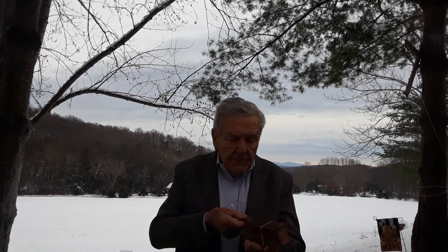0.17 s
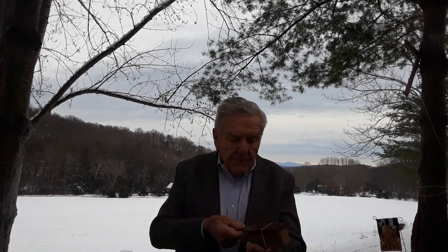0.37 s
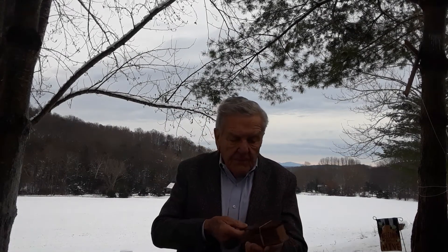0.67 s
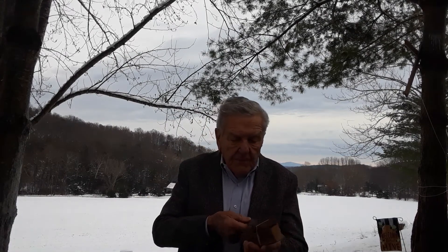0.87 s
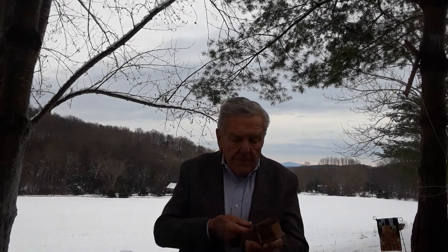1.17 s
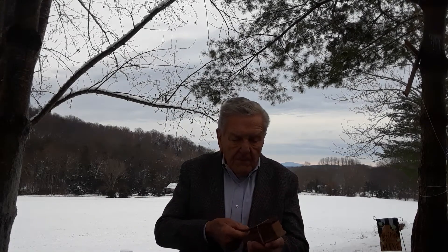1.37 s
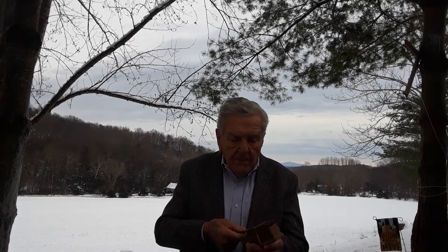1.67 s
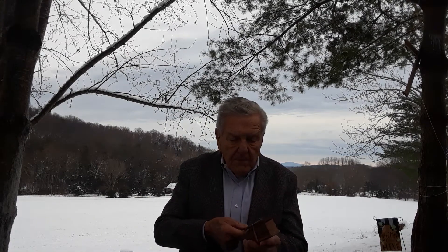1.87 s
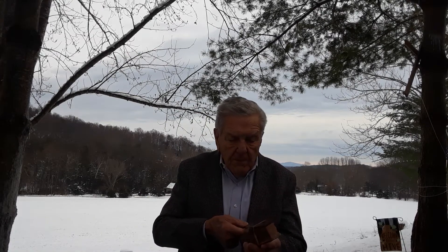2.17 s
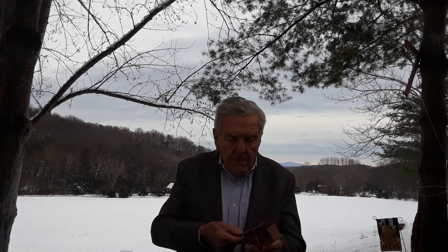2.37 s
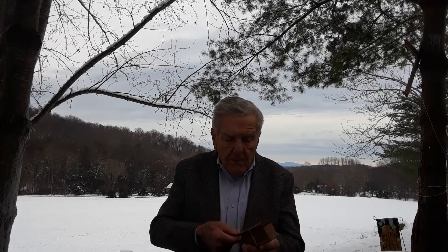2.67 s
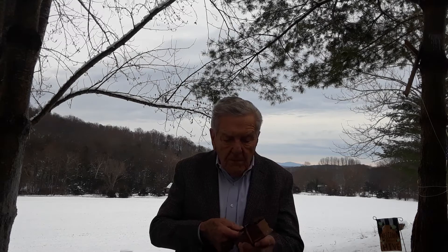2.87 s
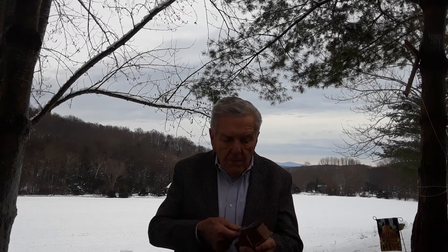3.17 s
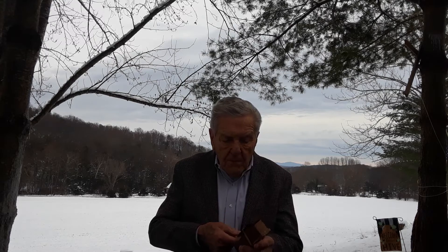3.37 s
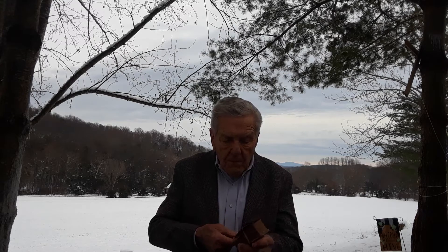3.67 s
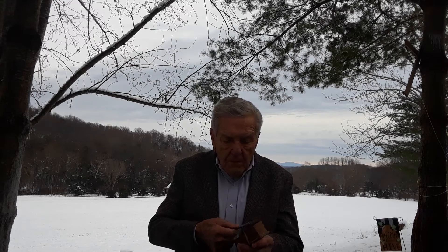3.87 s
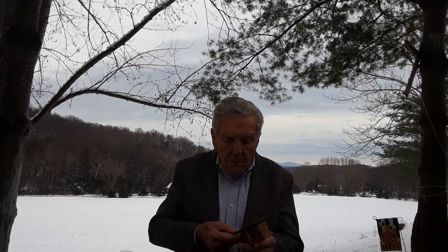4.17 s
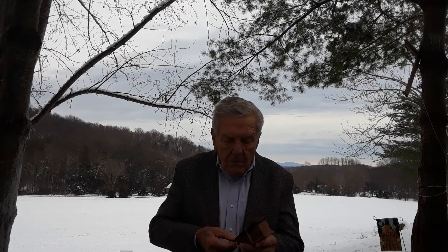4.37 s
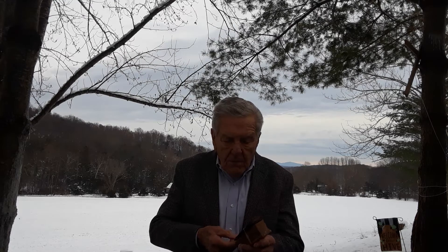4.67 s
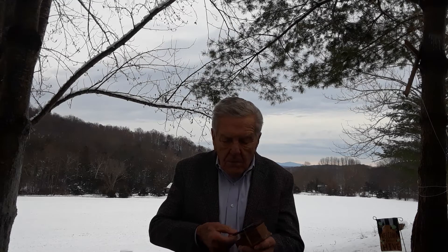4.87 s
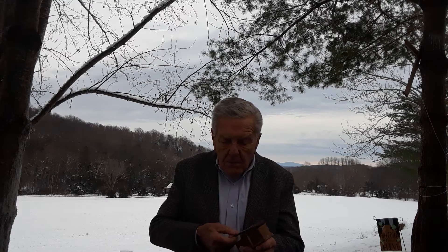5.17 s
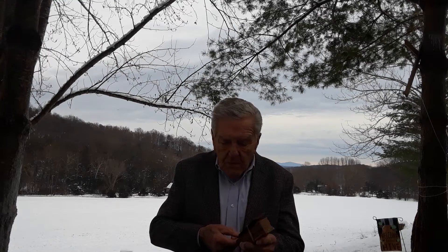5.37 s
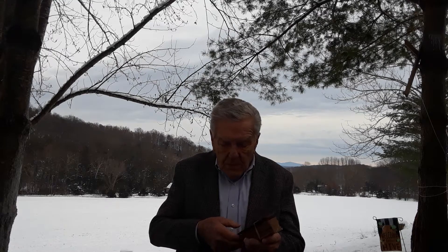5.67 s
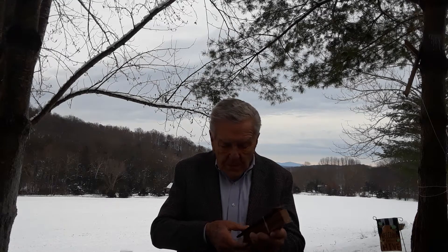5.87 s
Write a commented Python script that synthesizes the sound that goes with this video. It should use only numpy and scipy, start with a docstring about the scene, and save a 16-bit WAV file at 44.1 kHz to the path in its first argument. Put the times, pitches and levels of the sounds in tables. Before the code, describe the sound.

A hand-worked wooden box call, close and slightly right, in quiet outdoor air with a faint low hum. A weak raspy tail opens the clip, then light taps and tiny squeaks. Thin, hesitant yelps come at about 0.35, 0.7 and 1.35 seconds, with a scuff just before the last. The run strengthens at 1.65, 1.95, 2.3 and 2.6: sharp high squeals, mostly breaking downward into a lower scratchy rasp. From 2.7 to 3.6 there is a pause with dry rubs and barely audible lid squeaks. The second run yelps at 3.65, 4.0, 4.3, 4.65, 5.05 and 5.37, the 4.3 and 5.05 notes low and rough. Hollow wooden knocks cluster from 5.05 to 5.3. A short squeak at 5.64 and a soft knock at 5.7 finish it. Sleeves rustle lightly throughout; trees give short, diffuse echoes.

```python
"""Wooden box call in a wood

Two runs of yelps with a pause between: the lid sticks and slips on the rim in higher, mostly clearer notes
and lower raspy ones, which mostly follow them. Pitched partials, friction hiss and box modes make the tone.
The lid squeaks faintly on its way back; the box knocks, thuds and scuffs in the hand.
Sleeves rustle (filtered noise), trees echo (decaying scatter), a low hum lies under the still air."""
import sys
import numpy as np
from scipy import signal
from scipy.fft import rfft, irfft, next_fast_len
from scipy.io import wavfile

SR = 44100
rng = np.random.default_rng(int(sys.argv[2]) if len(sys.argv) > 2 else 0)


def wav_out(sig):
    """Save sig, one row per channel (or a flat mono array), as 16-bit PCM at SR to the path in sys.argv[1]."""
    wavfile.write(sys.argv[1], SR, np.round(np.clip(np.atleast_2d(sig).T, -1, 1) * 32767).astype(np.int16))


N = 264776
TIME = np.arange(N) / SR
CUTOFF_HZ = 16000

# wood knocking on wood: (time [s], strike level [dB], hollow thud over strike [dB])
KNOCK_STRIKES = [(0.142, -36.5, -3.5), (0.185, -39, 2.5), (0.295, -40.5, -5), (0.448, -36, 0.5),
                 (1.395, -34.5, -20.5), (2.5493, -48, -24), (5.0456, -17, 6), (5.061, -20.5, 8.5),
                 (5.093, -19, 5.5), (5.106, -20, -1), (5.1674, -14, 0), (5.170, -24.5, 16.5),
                 (5.176, -20.5, 1), (5.2845, -22.5, -7), (5.3024, -17.5, -6.5), (5.705, -30.5, -9)]


def from_db(db):
    """Decibels to gain."""
    return 10 ** (np.asarray(db) / 20)


def rms_one(x):
    """Scale to unit power."""
    return x / np.sqrt(np.mean(x ** 2) + 1e-20)


def gain_at(spectrum, hz):
    """Gain of a (Hz, dB) curve, interpolated on a log-frequency axis."""
    points_hz, db = np.transpose(spectrum)
    return from_db(np.interp(np.log(hz + 1e-9), np.log(points_hz), db))


def coloured(x, spectrum):
    """Filter a noise to a spectrum; overall rms 1."""
    size = x.shape[-1]
    gain = gain_at(spectrum, np.fft.rfftfreq(size, 1 / SR))
    return rms_one(irfft(rfft(x) * gain, size))


def flutter(rate_hz):
    """Random motion up to about the given rate; spread 1."""
    size = next_fast_len(N, real=True)
    hz = np.fft.rfftfreq(size, 1 / SR)
    noise = rfft(rng.standard_normal(size))
    return rms_one(irfft(noise / (1 + (hz / rate_hz) ** 2), size)[:N])


def resonance(x, hz, width_hz):
    """One damped mode with gain 1 at its top."""
    r = np.exp(-np.pi * width_hz / SR)
    b = np.array([1, 0, -1]) * (1 - r * r) / 2
    a = [1, -2 * r * np.cos(2 * np.pi * hz / SR), r * r]
    return signal.lfilter(b, a, x + 1e-18)


def placed(x):
    """Off to the right: over most of the band that side is earlier and louder."""
    # (frequency [Hz], phase by which left leads right [rad])
    phase_lead = [(100, 0), (1000, 1.02), (1400, -0.58), (2000, -0.5), (3300, -1.15), (5000, -1.75),
                  (8300, -2.0), (12000, -2), (16000, -1.5)]
    # (frequency [Hz], left over right [dB])
    balance = [(100, 2.5), (700, -0.5), (1300, -2), (2400, -3.5), (4400, -2.5), (8000, -5), (16000, 4)]
    hz = np.fft.rfftfreq(N, 1 / SR)
    points_hz, radians = np.transpose(phase_lead)
    lead = np.interp(hz, [0, *points_hz], [0, *np.unwrap(radians)])
    # each side takes half of the difference
    half = np.sqrt(gain_at(balance, hz)) * np.exp(.5j * lead)
    return irfft(rfft(x) * np.array([half, 1 / half]), N)


def still_air(level_db=-58.5, apart_db=3.0):
    """Coloured noise, partly common to both sides and partly separate."""
    # (frequency [Hz], relative density [dB per Hz])
    air_colour = [(53, -31.5), (90, -3.5), (210, -12.5), (737, -2.5), (915, -5.5), (1380, -4.5),
                  (3360, -28), (5070, -30.5), (7660, -31), (9720, -45), (15000, -27), (16000, -44.5)]
    common = rng.standard_normal(N)
    apart = from_db(apart_db) * rng.standard_normal((2, N))
    return from_db(level_db) * coloured(common + apart, air_colour)


def hum(hum_hz=65.5, level_db=-68, waver=.13):
    """A low sine whose strength and phase waver."""
    phase = 2 * np.pi * hum_hz * TIME
    in_phase = np.sin(phase) * (1 + waver * flutter(rate_hz=9))
    quadrature = waver * flutter(rate_hz=6.4) * np.cos(phase)
    return from_db(level_db) * np.sqrt(2) * (in_phase + quadrature)


def rustle(raise_db=5.0, folds_db=3.5):
    """Sleeves and hands rustle as the arm moves: coloured noise broken up by folds of cloth."""
    # (time [s], level before raise_db [dB])
    cloth_level = [(0.0, -65.5), (0.53, -70), (0.95, -67.5), (1.08, -63.5), (1.3, -73.5), (1.52, -64.5),
                   (1.75, -66.5), (2.22, -62), (2.39, -67), (2.71, -77), (2.94, -71), (3.68, -75),
                   (3.81, -77.5), (4.24, -62.5), (4.43, -69.5), (5.52, -69.5), (5.73, -75), (6.0, -77)]
    # (frequency [Hz], relative density [dB per Hz])
    cloth_colour = [(1000, 0), (3000, 5.5), (4200, -3), (5500, -4), (8000, 1.5), (9700, -9), (12000, -5.5),
                    (15500, -1)]
    folds = rms_one(from_db(folds_db * flutter(rate_hz=60)))
    noise = placed(rng.standard_normal(N)) + 1.2 * rng.standard_normal((2, N))
    level_db = np.interp(TIME, *np.transpose(cloth_level)) + raise_db
    return from_db(level_db) * coloured(noise, cloth_colour) * folds


def background():
    """Sum of the steady layers: still air, hum and rustling cloth."""
    return still_air() + hum() + rustle()


def echoes(x, level_db, t60_s, delay_s):
    """Scattered returns from trunks and branches: decaying noise, different at each ear."""
    # (frequency [Hz], relative response [dB])
    wood_colour = [(150, -15), (500, 8.5), (1300, -4), (2300, 2), (5000, -3.5), (9000, -3.5), (16000, 1.5)]
    t = TIME[:SR]
    decay = from_db(-60 * t / t60_s)
    onset = np.clip(t / delay_s - 1, 0, 1)
    scatter = coloured(rng.standard_normal((2, SR)), wood_colour) * decay * onset
    scatter /= np.sqrt(np.sum(scatter ** 2, axis=1, keepdims=True))
    return from_db(level_db) * signal.fftconvolve(x[None], scatter, axes=1)[:, :N]


def bumps():
    """Soft swells of band-limited noise as hand and sleeve shift."""
    # (time [s], level [dB], length [s], centre [Hz])
    swells = [(0.93, -64, 0.21, 2690), (0.978, -70, 0.15, 4900), (1.3, -60, 0.23, 460),
              (1.381, -60, 0.064, 182), (1.988, -60, 0.17, 385), (2.0, -58, 0.098, 14160),
              (2.098, -63, 0.14, 171.6), (3.98, -61, 0.039, 111.7), (4.872, -55.5, 0.071, 125)]
    out = np.zeros(N)
    for s, db, length_s, hz in swells:
        swell = np.sin(np.pi * np.clip((TIME - s) / length_s, 0, 1))
        noise = resonance(resonance(rng.standard_normal(N), hz, hz / 2), hz, hz)
        out += from_db(db) * swell * rms_one(noise)
    return out


def thuds(thud_db=25.0, low_db=17.5):
    """The hollow of the box answers the knocks: impulses into broad low modes."""
    taps = np.zeros(N)
    for s, db, hollow_db in KNOCK_STRIKES:
        taps[round(s * SR)] = from_db(db + hollow_db)
    hollow = from_db(thud_db) * resonance(taps, hz=400.0, width_hz=410)
    hollow += from_db(low_db) * resonance(taps, hz=196, width_hz=88)
    return resonance(hollow, hz=374, width_hz=480)


def box(x, damping=1):
    """All modes of the box in parallel; damping widens them."""
    # (frequency [Hz], width at damping 1 [Hz], gain [dB])
    modes = [(1055, 41, -46), (1424, 17, 38), (1400, 67, 11), (1915, 59, 21.5), (1924, 52, 3),
             (2440, 130, 27.5), (2670, 140, -32.5), (3070, 120, -22.5), (3850, 97, -6.5),
             (3850, 220, -17.5), (4380, 310, -13.5), (5100, 560, 1), (6860, 630, -17.5), (8300, 400, -40)]
    return sum(from_db(db) * resonance(x, hz, width_hz * damping) for hz, width_hz, db in modes)


def knocks(ring_db=-10.0, tick_db=28.5, contact_hz=3500):
    """Each knock ticks and rings the hand-damped box; soft wood dulls the contact."""
    taps = np.zeros(N)
    for s, db, _ in KNOCK_STRIKES:
        taps[round(s * SR)] = from_db(db)
    taps = signal.sosfilt(signal.butter(1, contact_hz, fs=SR, output="sos"), taps)
    tick = resonance(resonance(taps, hz=1270, width_hz=690), hz=1290, width_hz=550)
    return from_db(ring_db) * box(taps, damping=1.3) + from_db(tick_db) * tick


def scuffs(grain_db=1.0):
    """Dry grainy rubs of lid and fingers: noise that starts at once and fades exponentially."""
    # (time [s], level [dB], fade time constant [s])
    rubs = [(0.133, -59, .005), (0.238, -42.5, 0.0021), (0.484, -50, 0.013), (0.848, -50.5, 0.02),
            (1.287, -29.5, 0.014), (1.396, -39.5, 0.0026), (1.442, -49, 0.031), (2.685, -37, 0.016),
            (2.783, -44.5, 0.03), (3.218, -58.5, 0.041), (3.392, -56, .013), (3.963, -45, 0.011),
            (4.157, -42.5, 0.0025), (4.223, -45, 0.019), (4.268, -40, 0.0059), (4.87, -40.5, 0.0054)]
    # (frequency [Hz], relative density [dB per Hz])
    rub_colour = [(150, -22.5), (600, -0.5), (1300, -2), (2500, 2), (4500, -4), (8000, -5.5), (10000, -16),
                  (15000, -8.5)]
    level = np.zeros(N)
    for s, db, fade_s in rubs:
        level += from_db(db) * (TIME >= s) * np.exp(-np.abs(TIME - s) / fade_s)
    grain = rng.standard_normal(N) * from_db(grain_db * flutter(rate_hz=650))
    return level * coloured(grain, rub_colour)


def wood_grain(x, t60_s, share):
    """The plank's many small, quickly dying resonances break gliding partials into blotches."""
    t = TIME[:SR // 20]
    ring = rng.standard_normal(len(t)) * from_db(-60 * t / t60_s)
    rung = signal.fftconvolve(x, ring / np.linalg.norm(ring))[:N]
    return np.sqrt(1 - share) * x + np.sqrt(share) * rung


def second_mode(pitch_hz, first, phase, level_db=-4.5, mode_hz=2275, pull=0.45, mixing=0.12, beat_db=-4.0):
    """On a rough high note a second mode of the wall sings along and mixes with the slip rate."""
    own_hz = mode_hz + pull * (pitch_hz - 1320) + 25 * flutter(rate_hz=220)
    own = 2 * np.pi * np.cumsum(own_hz) / SR
    high_share = np.interp(pitch_hz, [1150, 1280, 1450], [0.13, 0.8, 0.35])
    mixed = np.sin(own) * (1 + mixing * np.cos(phase))
    mixed += from_db(beat_db) * np.sin(2 * (own - phase))
    return from_db(level_db) * first * high_share * mixed


def partials(pitch_hz, phase, upper, rasp, brightening=0.6, chatter_db=5.0):
    """Third and higher harmonics: brighter when the lid bites harder, throbbing as it chatters."""
    # the box's radiation: (frequency [Hz], relative response [dB])
    radiation = [(2500, 4.5), (3150, 5.5), (3700, -0.5), (4400, -1.5), (5300, -1.5), (6500, -13.5),
                 (7300, -12), (8400, -11), (9400, -35.5), (11000, -27), (14500, -37.5), (16000, -45)]
    orders = np.arange(3, 17)[:, None]
    partial_hz = orders * pitch_hz
    bite_db = np.clip(20 * np.log10(upper + 1e-9) + 28, -20, 4)
    tilt = from_db(brightening * bite_db * np.log2(orders / 3))
    shape = gain_at(radiation, partial_hz) * (partial_hz < CUTOFF_HZ) * tilt
    shape = shape / np.sqrt(np.sum(shape ** 2, axis=0))
    wobbles = [flutter(rate_hz=220) for _ in range(5)]
    tone = np.zeros(N)
    for k, gain in zip(orders[:, 0], shape):
        # higher partials lose step with the slips sooner
        wobble = .5 * np.sqrt(k) * (rasp + .1) * wobbles[k % 5]
        tone += gain * np.sin(k * phase + k * k + wobble)
    return upper * tone * rms_one(from_db(chatter_db * flutter(rate_hz=46)))


def stick_slip(pitch_hz, first, octave, upper, rasp, jitter=0.016, shimmer=0.25, ring_db=-6.5, hiss_db=0.0):
    """The lid slips once a cycle; rasp unsettles the rate and the partials and shakes the box's modes."""
    # hiss of the rubbing wood: (frequency [Hz], relative density [dB per Hz])
    friction_colour = [(200, -57), (650, -31.5), (950, 11.5), (1900, 12.5), (3000, -8.5), (5000, -36),
                       (6500, -25), (8300, -8), (9500, -55.5), (14500, -37), (16500, -42.5)]
    slip_hz = pitch_hz * (1 + jitter * rasp * flutter(rate_hz=540))
    phase = 2 * np.pi * np.cumsum(slip_hz) / SR
    low = first * (1 + shimmer * rasp * flutter(rate_hz=120)) * np.sin(phase)
    octave_level = octave * (1 + 2 * shimmer * rasp * flutter(rate_hz=63))
    low += octave_level * np.sin(2 * phase + rasp * flutter(rate_hz=37))
    high = wood_grain(partials(pitch_hz, phase, upper, rasp), t60_s=.02, share=.38)
    tone = low + high + second_mode(pitch_hz, first * rasp, phase)
    # every slip drags a puff of friction noise with it
    puffs = 1 + 0.26 * np.cos(phase)
    force = rasp * np.sqrt(0.22 * first ** 2 + 0.25 * octave ** 2 + upper ** 2)
    grain = rng.standard_normal(N) * puffs
    ringing = box(grain * force) / np.std(box(grain))
    hiss_level = rasp * np.hypot(upper, 0.65 * force)
    hiss = hiss_level * coloured(rng.standard_normal(N) * puffs, friction_colour)
    return np.sqrt(2) * tone + from_db(ring_db) * ringing + from_db(hiss_db) * hiss


def squeaks(sag=0.24, octave_db=-19.5, upper_db=-15.0, bite=.45, rasp=0.94):
    """The returning lid catches for a few cycles, sagging in pitch; firmer catches carry more overtones."""
    # light touches of the lid: (time [s], mid pitch [Hz], peak level [dB], length [s])
    touches = [(.229, 1453, -46, 0.011), (.245, 1310, -43, 0.026), (.443, 1355, -51.5, 0.0054),
               (.604, 1386, -49.5, 0.0075), (.926, 1482, -45, 0.016), (1.219, 1442, -50, 0.0055),
               (1.423, 1314, -45.5, 0.0083), (1.537, 1393, -48, .009), (1.852, 1547, -45, 0.0059),
               (2.203, 1272, -42, 0.01), (2.55, 1499, -33.5, 0.014), (2.871, 1404, -50.5, 0.0087),
               (2.98, 1375, -52, 0.02), (3.129, 1428, -54, 0.017), (4.266, 1402, -36, .016),
               (4.504, 1350, -46.5, 0.015), (4.572, 1461, -43.5, .014), (4.59, 1434, -36, .008),
               (4.85, 1403, -48, .018), (5.002, 1404, -33.5, .014), (5.149, 1367, -43, .014),
               (5.637, 1456, -27.5, 0.012)]
    pitch_hz, level = np.full(N, float(touches[0][1])), np.zeros(N)
    for s, hz, db, length_s in touches:
        now = (TIME >= s) & (TIME < s + length_s)
        progress = (TIME[now] - s) / length_s
        pitch_hz[now] = hz * (1 + sag * (.5 - progress))
        level[now] = from_db(db) * np.sin(np.pi * progress ** 0.65)
    overtones = level * (level / level.max()) ** bite
    octave, upper = overtones * from_db(octave_db), overtones * from_db(upper_db)
    return stick_slip(pitch_hz, level, octave, upper, rasp, jitter=.07, shimmer=0.56, hiss_db=2.5)


def lid_ring(x, hz=1795, width_hz=13, level_db=-4.0):
    """A lightly damped mode of the lid sings on after a stroke."""
    return from_db(level_db) * resonance(x, hz, width_hz)


def note_span(s, length_s, attack_s, release_s, margin_s=.04):
    """A squeal grows and dies exponentially; gives its samples, age [s] and envelope."""
    now = (TIME >= s - margin_s) & (TIME < s + length_s + margin_s)
    age_s = TIME[now] - s
    attack = 1 / (1 + np.exp(-age_s / attack_s))
    contact = attack / (1 + np.exp((age_s - length_s) / release_s))
    return now, np.clip(age_s, 0, length_s), contact


def high_note(s, length_s, attack_s, hz, glide, db, octave_db, upper_db, rasp):
    """The lid grips: a higher note that sags, brightens as the lid presses harder, and dives at its end."""
    dive_hz, dive_s, bite_db_per_s = 69.5, 0.0036, 179.5
    now, age_s, contact = note_span(s, length_s, attack_s, release_s=0.0033)
    from_middle_s = age_s - length_s / 2
    dive = dive_hz * np.exp((age_s - length_s) / dive_s)
    pitch_hz = hz + glide * from_middle_s - dive
    bite_db = bite_db_per_s * from_middle_s
    return now, contact, (pitch_hz, db, octave_db + bite_db, upper_db + bite_db, rasp)


def low_note(s, length_s, attack_s, hz, glide, db, octave_db, upper_db, rasp):
    """A looser grip: a lower note whose pitch drops at its start in a burst of rasp, then glides and fades."""
    drop_hz, drop_s = 150, .0055   # start above the glide, settling time
    burst_rasp, burst_s = 0.3, .012
    fade_db_per_s, octave_fade_db_per_s = 40, 65.5
    now, age_s, contact = note_span(s, length_s, attack_s, release_s=.005)
    from_middle_s = age_s - length_s / 2
    pitch_hz = hz + glide * from_middle_s + drop_hz * np.exp(-age_s / drop_s)
    rough = rasp + burst_rasp * np.exp(-age_s / burst_s)
    first_db = db - fade_db_per_s * from_middle_s
    octave_db = octave_db - octave_fade_db_per_s * from_middle_s
    return now, contact, (pitch_hz, first_db, octave_db, upper_db, rough)


def sing(notes):
    """Join notes into one squeal; where two overlap, pitch and rasp slide from one to the other."""
    pitch_hz, first, octave, upper, rasp, weight = np.zeros((6, N))
    for now, contact, (hz, db, octave_db, upper_db, rough) in notes:
        first[now] += contact * from_db(db)
        octave[now] += contact * from_db(db + octave_db)
        upper[now] += contact * from_db(db + upper_db)
        pitch_hz[now] += contact * hz
        rasp[now] += contact * rough
        weight[now] += contact
    touching = weight > 0

    def joined(total):
        """Contact-weighted mean, bridged across the gaps."""
        return np.interp(TIME, TIME[touching], total[touching] / weight[touching])

    return stick_slip(joined(pitch_hz), first, octave, upper, np.clip(joined(rasp), 0, 1))


def yelps():
    """Full strokes of the lid; where a high and a low note meet, both sound together for a moment."""
    # higher, mostly clearer notes, usually at the start of a stroke: (time [s], length [s], attack [s],
    # mid pitch before dive [Hz], glide [Hz/s], fundamental level [dB], mid octave over fundamental [dB],
    # mid upper partials over fundamental [dB], rasp [0-1])
    higher_notes = [(0.366, 0.022, 0.0086, 1318, -500, -22, -18.5, -21, 0.37),
                    (0.706, 0.024, 0.0025, 1446, -2500, -22, -13.5, -20.5, 0.36),
                    (1.351, 0.023, 0.0055, 1478, -4500, -23.5, -12.5, -24, 0.36),
                    (1.636, 0.028, .0022, 1421, -3500, -16.5, -11, -17.5, 0.18),
                    (1.686, 0.020, 0.0032, 1434, -500, -26.5, -27, -26.5, .3),
                    (1.936, 0.019, 0.0047, 1335, -600, -10.5, -13.5, -18, 0.6),
                    (2.284, 0.025, 0.0034, 1319, -600, -16.5, -11.5, -14, 0.52),
                    (2.592, 0.029, 0.0033, 1330, -400, -20.5, -9.5, -13, 0.63),
                    (3.659, 0.016, 0.002, 1380, -2700, -16, -13, -12, 0.02),
                    (3.976, 0.015, 0.0013, 1347, -4200, -16.5, -19.5, -14, 0.36),
                    (4.651, 0.027, 0.0037, 1125, -400, -25.5, 7.5, 0.5, 0.18),
                    (5.366, 0.020, 0.0028, 1348, -500, -11, -17.5, -14.5, 0.71)]
    # lower raspy notes, mostly after a clear note, some before one or alone: (time [s], length [s],
    # attack [s], mid pitch before initial drop [Hz], glide [Hz/s], mid fundamental level [dB],
    # mid octave over db column [dB], upper partials over db column [dB], rasp before burst [0-1])
    lower_notes = [(-0.025, 0.075, 0.0026, 883, -1400, -42.5, 13, 5.5, 0.26),
                   (0.344, 0.044, 0.0033, 963.5, -1800, -41.5, 5, -13, 0.29),
                   (1.670, 0.014, 0.0021, 1203, -2500, -29, -4, -23, 0.5),
                   (1.964, 0.039, 0.00141, 900.7, -300, -31, 8.5, 5, 0.43),
                   (2.312, 0.033, 0.0023, 1005, -2500, -36.5, 13.5, 5, 0.88),
                   (2.623, 0.02, 0.0028, 969.7, 3506, -35, 13.5, 8.5, 0.6),
                   (2.646, 0.013, 0.0022, 865, -3, -32, 5.5, 6, 0.36),
                   (3.678, 0.015, 0.0016, 1216, -1000, -19, -5.5, -5.5, 0.25),
                   (3.696, 0.025, 0.0021, 899.2, 1513.5, -29.5, 3, 4, 0.57),
                   (3.723, 0.020, 0.0038, 1067, 3498, -27, -7, -4, .35),
                   (3.992, 0.013, 0.0027, 1215, -2000, -19.5, -10, -17, 0.25),
                   (4.008, 0.010, 0.0017, 880.6, 2, -30.5, 3, 7.5, 0.86),
                   (4.019, 0.018, 0.0017, 1053, 2003, -31, -1, -1.5, 0.59),
                   (4.317, 0.053, 0.00077, 1033, 90, -30, -1.5, -1.5, 0.53),
                   (4.679, 0.038, 0.001, 1020, 1504, -28.5, -1.5, 1.5, 0.3),
                   (5.059, 0.037, 0.0017, 1045, -1500, -25.5, -.5, 0, 0.27),
                   (5.389, 0.058, 0.0042, 1058, 599.5, -25, -4.5, -0.5, 0.42)]
    high = sing([high_note(*row) for row in higher_notes])
    low = sing([low_note(*row) for row in lower_notes])
    return high + low


def scene():
    """The call, near trunks, the deeper wood and the background."""
    call = yelps() + squeaks() + scuffs()
    ring = lid_ring(call) + lid_ring(call, hz=2270, width_hz=6, level_db=-13.5)
    call = call + ring + knocks()
    low = thuds() + bumps()
    near = echoes(call, level_db=-9.0, t60_s=0.19, delay_s=0.0021)
    far = echoes(call + .3 * low, level_db=-27.0, t60_s=1.0, delay_s=0.024)
    return placed(call) + low + near + far + background()


def record(dry):
    """Steep elliptic low-pass cuts the top."""
    return signal.sosfilt(signal.ellip(10, .1, 80, CUTOFF_HZ, fs=SR, output="sos"), dry)


dry = scene()
out = record(dry)
wav_out(out)
```